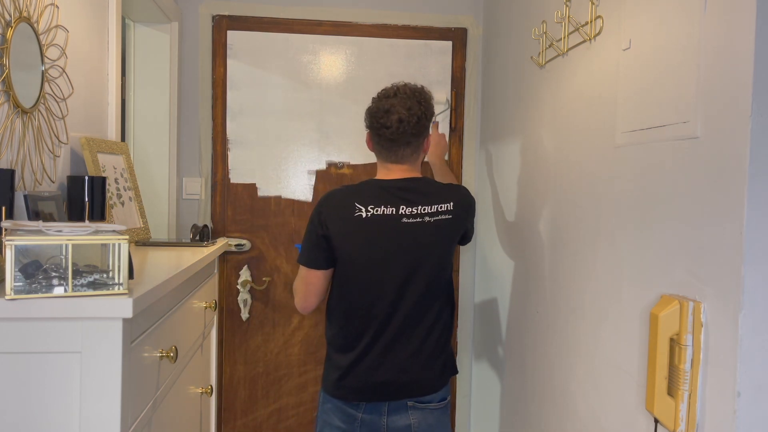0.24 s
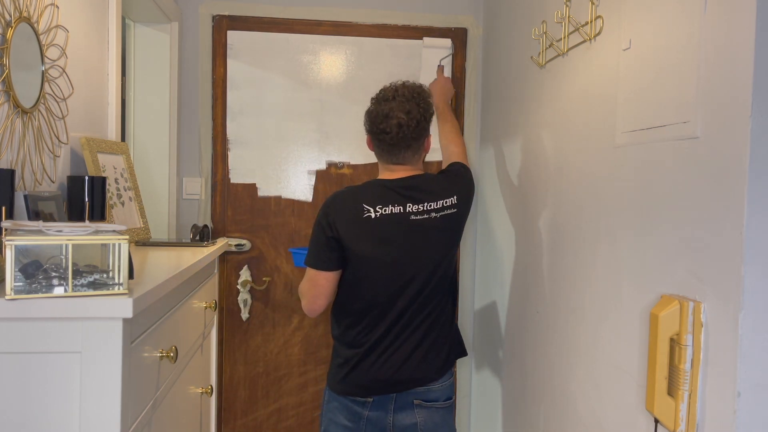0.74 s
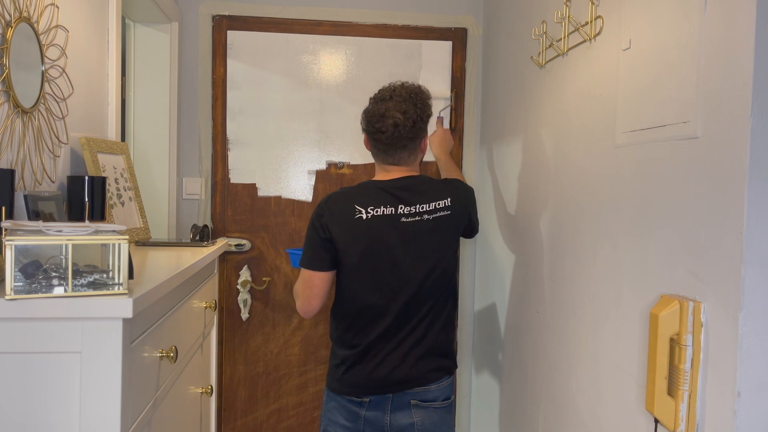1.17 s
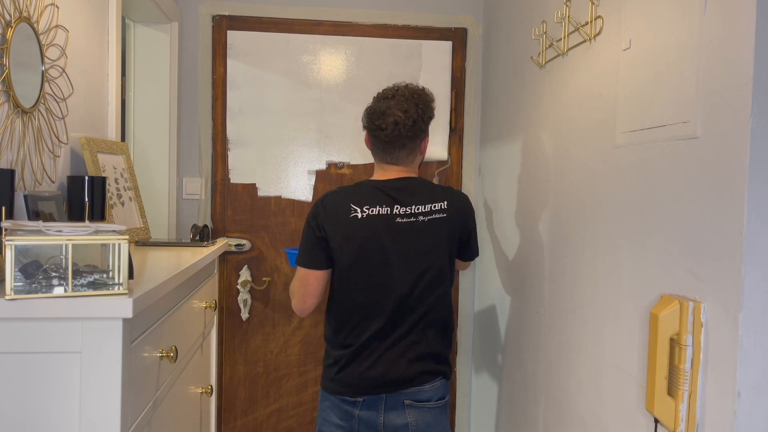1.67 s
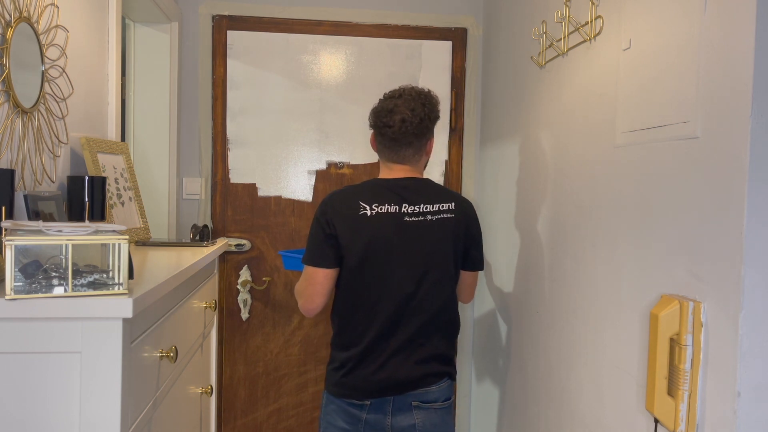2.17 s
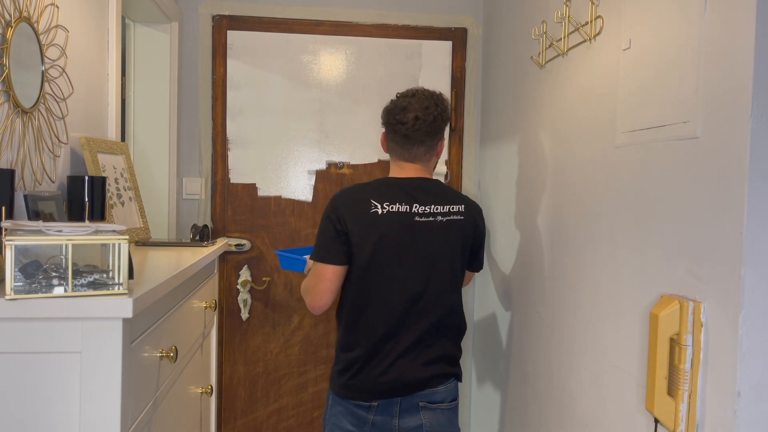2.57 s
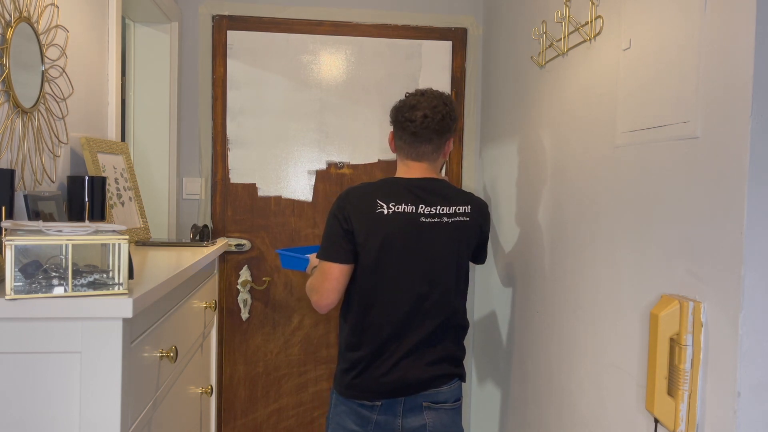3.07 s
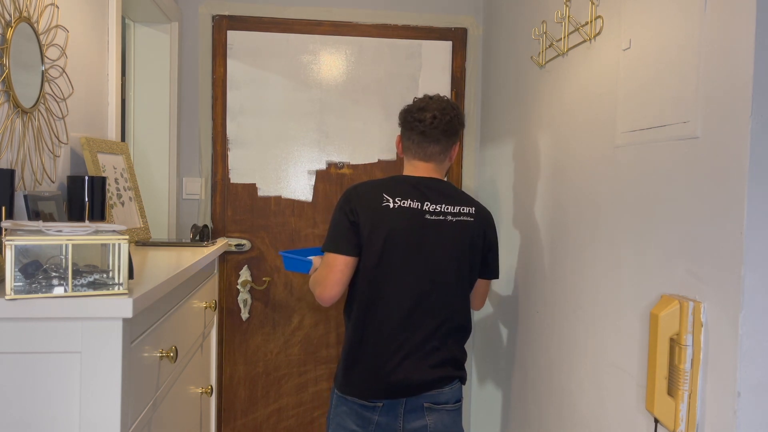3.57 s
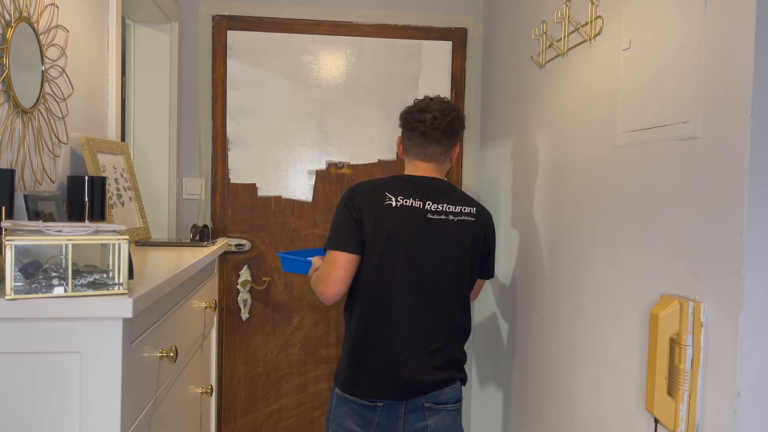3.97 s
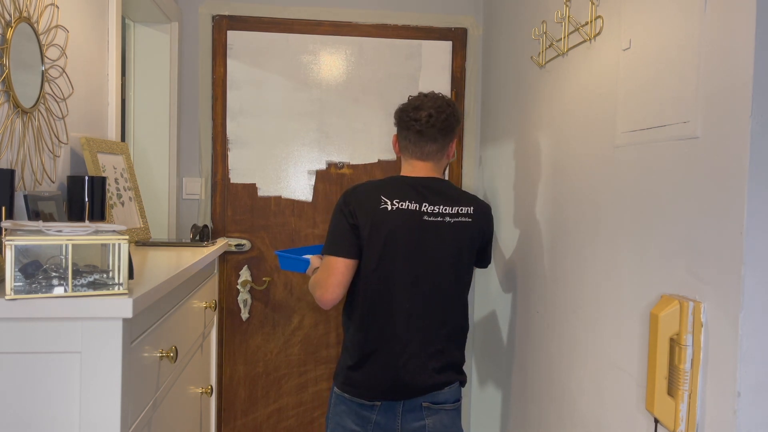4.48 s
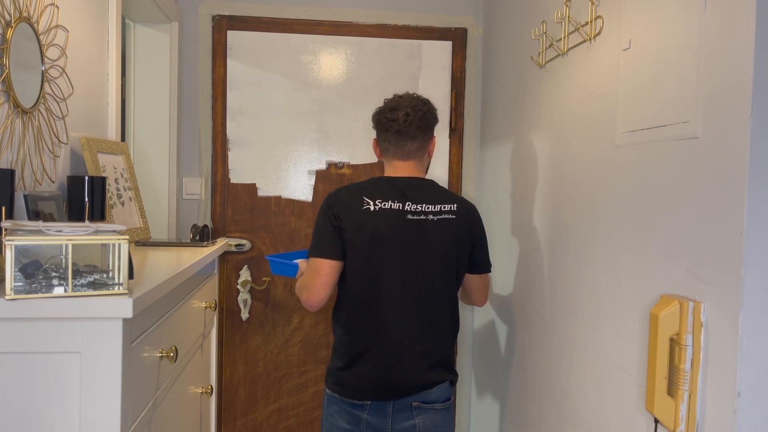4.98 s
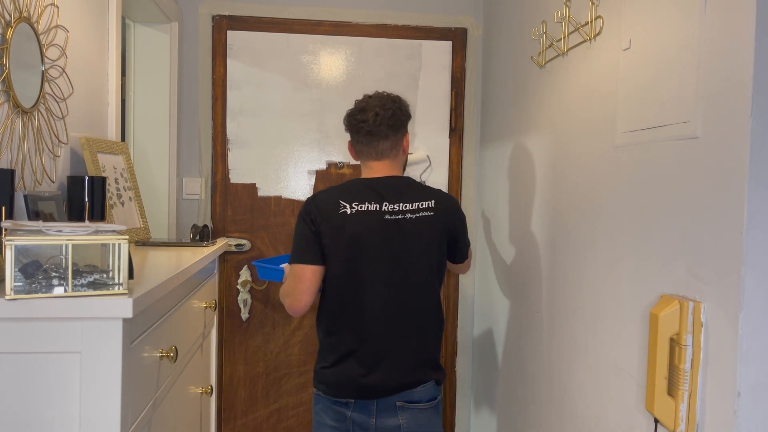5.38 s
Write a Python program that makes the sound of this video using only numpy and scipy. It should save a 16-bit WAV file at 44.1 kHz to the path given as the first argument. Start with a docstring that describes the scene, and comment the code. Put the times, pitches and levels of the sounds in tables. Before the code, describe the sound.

A small wet paint roller hisses stickily over a wooden door in repeated passes, with light clicking knocks and a low panel rumble indoors.

```python
"""A small paint roller is already moving on a wooden door in a narrow hallway; faint air sounds throughout.
In the first second come the end of one pass, a slow faint creep and a short dab, with three bubble ticks.
A long pass with five knocks follows, then five more, two knocks on the second and three on the fourth.
Each pass is a sticky hiss of random snaps, with a nap rub, a hollow note and a low rumble of the door panel.
A knock is a short click of the sleeve on its wire axle, with a scrape, a bounce, a ring and a thud."""
import sys
import numpy as np
from scipy import signal
from scipy.fft import rfft, irfft, next_fast_len
from scipy.io import wavfile
from scipy.ndimage import uniform_filter1d, map_coordinates

SR = 44100
rng = np.random.default_rng(int(sys.argv[2]) if len(sys.argv) > 2 else 0)


def master_out(mix):
    """Clip the mix to full scale and print it as 16-bit PCM to the path in sys.argv[1]."""
    frames = np.transpose(np.atleast_2d(mix))
    ceiling = np.clip(frames, -1, 1)
    pcm = np.round(ceiling * 32767).astype(np.int16)
    wavfile.write(sys.argv[1], SR, pcm)


N = 248178  # length in samples


def amp(db):
    """Turn decibels into gain."""
    return 10 ** (np.asarray(db) / 20)


def unit(x):
    """Scale to an average (rms) level of 1."""
    return x / np.sqrt(np.mean(x ** 2) + 1e-20)


def along(points, hz):
    """Read a curve of (Hz, value) points, with frequency on a log axis."""
    f, v = np.transpose(points)
    return np.interp(np.log(hz + 1), np.log(f + 1), v)


def wobble(rate):
    """Draw a smooth random curve with rate knots a second."""
    knots = rng.standard_normal(int(N * rate / SR) + 4)
    return map_coordinates(knots, [np.arange(N) * rate / SR])


def bumps(rows, width_s):
    """Draw a dB curve with one smooth bump for each (s, dB)."""
    t = np.arange(N) / SR
    return sum(db * np.exp(-((t - s) / width_s) ** 2) for s, db in rows)


def arch(start, end, db, drift, rise_s, fall_s):
    """Shape the gain of one gesture: it grows from rest, drifts in level and comes back to rest."""
    t = np.clip(np.arange(N) / SR, start, end)
    rise = 1 - np.exp((start - t) / rise_s)
    fall = 1 - np.exp((t - end) / fall_s)
    return rise * fall * amp(db + drift * (t - (start + end) / 2))


def together(gains, smear_s=0.053):
    """Add gestures in power and smear them, as the hallway fills the instant of rest at a turn."""
    power = uniform_filter1d(np.sum(np.square(gains), axis=0), size=round(smear_s * SR))
    return np.sqrt(np.abs(power) + 1e-12)


def filtered(x, response):
    """Multiply the spectrum of x by a response that depends on frequency."""
    n = x.shape[-1]
    m = next_fast_len(n + SR // 2)
    return irfft(rfft(x, m) * response(np.fft.rfftfreq(m, 1 / SR)), m)[..., :n]


def coloured(x, spectrum):
    """Give x a (Hz, dB) colour at rms 1."""
    return unit(filtered(x, lambda hz: amp(along(spectrum, hz))))


def resonate(x, modes):
    """Pass x through vibration modes, each a peak of (centre Hz, width Hz, dB)."""
    def response(f):
        return sum(amp(db) * 1j * f * w / (c * c - f * f + 1j * f * w) for c, w, db in modes)
    return filtered(x, response)


def pulse(gain_db, size=4096):
    """Make the shortest causal (minimum-phase) click with a given colour, peak 1."""
    cepstrum = irfft(np.log(amp(gain_db(np.fft.rfftfreq(size, 1 / SR)))))
    # folding the second half onto the first packs the energy at the start
    cepstrum[1:size // 2] *= 2
    cepstrum[size // 2 + 1:] = 0
    click = irfft(np.exp(rfft(cepstrum)))
    return click / np.abs(click).max()


def copies(x, taps):
    """Add up delayed copies of x, one for each (s, dB)."""
    return sum(amp(db) * np.pad(x, (round(s * SR), 0))[:len(x)] for s, db in taps)


# How long the hallway rings.
# Each row: frequency in Hz, time to fade by 60 dB in seconds.
HALL_FADE = [(150, 0.27), (1200, 0.37), (4000, 0.19), (12000, 0.048)]


def hallway(x):
    """Give two unrelated diffuse answers of the hallway, as fading noise; treble dies first."""
    hz, t, z = signal.stft(rng.standard_normal((2, SR // 2)), SR, nperseg=256)
    fade = amp(-60 * t / along(HALL_FADE, hz)[:, None])
    tail = signal.istft(z * fade, SR, nperseg=256)[1]
    return signal.fftconvolve(x[None], tail / np.linalg.norm(tail[0]), axes=1)[:, :len(x)]


# How wide the sound spreads between left and right.
# Each row: frequency in Hz, gain of the side signal against the middle in dB.
STEREO_WIDTH = [(60, -32), (110, -7.5), (200, -12.5), (380, -8), (750, -4), (1500, -6), (2600, -7.5),
                (4000, -8.5), (5700, -4), (8500, -15.5), (11300, -51), (12200, -8)]


def spread(pair):
    """Turn two unrelated signals into left and right, with a width that depends on frequency."""
    side = filtered(pair[1], lambda hz: amp(along(STEREO_WIDTH, hz)))
    return np.array([pair[0] + side, pair[0] - side])


def in_room(x, wet_db):
    """Put a source straight ahead with the hallway around it."""
    return x + amp(wet_db) * spread(hallway(x))


def snaps(rate, scatter_db):
    """Scatter random tiny impulses of very unequal size, rate a second on average, at rms 1."""
    happens = rng.random(N) < rate / SR
    return unit(happens * rng.standard_normal(N) * amp(scatter_db * rng.standard_normal(N)))


def grainy(spectrum, rate, scatter_db, direct_db, blur_s, echo_db):
    """Mix snaps and their echoes; the roller moves, so most echo paths blur into a noisy wash."""
    grains = snaps(rate, scatter_db)
    keep = np.exp(-1 / (blur_s * SR))
    # the loudness of the wash follows the recent energy of the snaps
    energy = signal.lfilter([1 - keep], [1, -keep], grains ** 2 - 1) + 1
    wash = rng.standard_normal((2, N)) * np.sqrt(np.abs(energy))
    pair = wash + amp(echo_db) * unit(hallway(grains))
    pair[0] += amp(direct_db) * grains
    return spread(coloured(np.array([unit(pair[0]), unit(pair[1])]), spectrum))


SPEED_UP_S, SLOW_DOWN_S = 0.15, 0.16  # the arm gathers speed after a turn and brakes before the next
WOOD_LAG_S = 0.018  # after a turn the wood answers a little later than the paint
BEAR_DB, BEAR_LAG_S, BEAR_S = 6, 0.023, 0.024  # just after a knock the sleeve bears harder on the wood
PATCH_S = 0.047  # half the time a patch spends on the door

# The passes of the roller, before their speed-up and slow-down.
# Each row: start in seconds, end in seconds, paint hiss at mid-pass in dB, drift in dB per second,
# nap rub over the hiss in dB, hollow rub over the hiss in dB.
PASSES = [ (-.427, 0.185, -43, -18.5, -11, -21.5), (-.148, 0.857, -57.5, 15.5, -13.5, -17),
          (0.359, 0.543, -36, 5, -19, -18.5), (0.832, 2.28, -47.5, -5.5, -15.5, -21.5),
          (2.302, 3.009, -43, -3, -16.5, -24), (2.999, 3.763, -43, -3.5, -16.5, -24),
          (3.749, 4.415, -41.5, -7.5, -16, -22), (4.443, 4.975, -38.5, -13.5, -16, -24),
          (4.991, 5.684, -40.5, 2.5, -14.5, -20)]
# Wetter (+) or drier (-) patches of the sleeve come round.
# Each row: time in seconds, change of level in dB.
WET_PATCHES = [ (.455, 3.5), (1.07, 3.5), (1.17, -3), (1.39, -7), (1.65, -5), (1.9, -1.5), (2.0, 2.5),
               (2.11, 3.5), (3.39, -2.5), (3.98, 2)]


def rolling():
    """Shape the gains of paint hiss, nap rub and hollow rub from the passes, wet patches and knocks."""
    paint_passes, nap_passes, wood_passes = [], [], []
    for start, end, db, drift, rub_db, hollow_db in PASSES:
        stroke = arch(start, end, db, drift, SPEED_UP_S, SLOW_DOWN_S)
        paint_passes.append(stroke)
        nap_passes.append(amp(rub_db) * stroke)
        late_start, late_end = start + WOOD_LAG_S, end + WOOD_LAG_S
        wood_passes.append(arch(late_start, late_end, db + hollow_db, drift, SPEED_UP_S, SLOW_DOWN_S))
    wetness = amp(bumps(WET_PATCHES, PATCH_S))
    bearing = amp(bumps([(row[0] + BEAR_LAG_S, BEAR_DB) for row in SLEEVE_KNOCKS], BEAR_S))
    return wetness * together(paint_passes), wetness * together(nap_passes), bearing * together(wood_passes)


# The colour of snapping paint threads.
# Each row: frequency in Hz, relative level in dB per Hz.
PAINT_COLOUR = [(1200, -28.5), (2600, -19), (4000, -14), (5200, -11.5), (6600, -10.5), (8000, -4.5),
                (9100, 1), (10200, 2.5), (11000, -4), (12000, -9), (13200, -25), (15700, -21.5)]


def paint(gain, full_treble_db=-49):
    """Threads of wet paint snap behind the sleeve as a dense hiss."""
    threads = grainy(PAINT_COLOUR, rate=4500, scatter_db=2.0, direct_db=-2.5, blur_s=0.093, echo_db=-2)
    hiss = gain * amp(0.7 * wobble(45)) * threads
    # where the gain is below full_treble_db, the hiss is duller in the top treble
    treble_share = [(8500, 0.28), (11500, 0.39), (13000, 1)]  # Hz, share of the hiss
    treble = filtered(hiss, lambda hz: np.clip(along(treble_share, hz), 0, 1))
    treble_gain = np.minimum(gain / amp(full_treble_db), 1) ** 1.16
    return hiss + treble * (treble_gain - 1)


# The colour of the rubbing nap.
# Each row: frequency in Hz, relative level in dB per Hz.
NAP_COLOUR = [(300, -26), (700, -8.5), (1000, 2.5), (1400, 3), (2400, 1.5), (3600, -2), (6000, -31)]
# The colour of the door's hollow note.
# Each row: frequency in Hz, relative level in dB per Hz.
HOLLOW_COLOUR = [(90, -22), (130, 3), (190, 0.5), (280, -1), (400, -0.5), (560, 2), (750, 4), (1200, -16),
                 (3000, -48)]
# The ringing modes of the wire frame, also rung by the knocks.
# Each row: centre in Hz, width in Hz, relative level in dB.
FRAME_MODES = [(410, 13, -17), (819, 13, 11), (898, 14, -9), (1019, 16, 11), (1201, 69, 9), (1300, 42, -16),
               (1430, 12, -6), (1573, 42, 10.5), (1836, 15, -17), (1938, 32, 10.5), (2108, 42, 7.5),
               (2300, 71, -5), (2500, 34, -8)]


def rubbing(nap_gain, hollow_gain):
    """The nap rubs and stirs the wire frame, and the door answers with a hollow note."""
    nap = grainy(NAP_COLOUR, rate=1200, scatter_db=2.5, direct_db=-4.5, blur_s=0.011, echo_db=-1.5)
    frame = spread(unit(resonate(rng.standard_normal((2, N)), FRAME_MODES)))
    rub = nap_gain * amp(1.3 * wobble(45)) * unit(nap + amp(-9) * frame)
    wood = grainy(HOLLOW_COLOUR, rate=600, scatter_db=3.5, direct_db=-6.0, blur_s=0.012, echo_db=0.0)
    return rub + hollow_gain * amp(0.7 * wobble(8.5)) * wood


LEAN_IN_S, LET_GO_S = 0.054, 0.21  # pressure builds quickly and eases slowly
PANEL_HZ = 65  # the strongest low mode of the panel

# The hand leans on the door.
# Each row: start in seconds, end in seconds, panel rumble at the middle in dB, drift in dB per second,
# higher modes over the rumble in dB; levels are before the build-up and easing.
HAND_PRESSES = [ (-.161, .245, -56, 11, -19), (0.852, 2.386, -67.5, 12, -17.5),
                (2.437, 2.95, -49.5, -20, -28), (3.217, 3.737, -54, 29, -20),
                (3.759, 4.42, -47.5, -10, -22), (4.575, 5.043, -43.5, -22, -22),
                (5.074, 5.693, -44, 9, -17.5)]
# The lowest modes of the door panel.
# Each row: centre in Hz, width in Hz, relative level in dB.
LOW_DOOR_MODES = [(33, 3.4, -4.5), (40.7, 7, -2.1), (PANEL_HZ, 5, 5.1), (71.5, 15, -18), (102, 14, -24)]
# The panel's higher modes, also struck by the knocks.
# Each row: centre in Hz, width in Hz, relative level in dB.
HIGH_DOOR_MODES = [(109, 7.7, 4.5), (138.5, 5.8, -0.5), (172.7, 8.2, 6.5), (213.5, 21, -2),
                   (292, 61, -11.5)]


def rumble(lumpy_db=1.5):
    """The uneven sleeve shakes the door panel, mostly in its lowest modes."""
    presses = []
    for start, end, db, drift, upper_db in HAND_PRESSES:
        press = arch(start, end, db, drift, LEAN_IN_S, LET_GO_S)
        presses.append(press * amp([[0], [upper_db]]))
    swing, upper_swing = together(presses) * amp(lumpy_db * wobble(16))
    low = resonate(rng.standard_normal((2, N)), LOW_DOOR_MODES)
    # the hand keeps the pressure even, so the panel's swing follows the press
    low /= np.sqrt(np.abs(uniform_filter1d(low ** 2, size=5000, axis=1)) + 1e-20)
    # keep about 27 to 95 Hz
    low = filtered(swing * low, lambda hz: 1 / np.sqrt((1 + (27 / (hz + 1)) ** 12) * (1 + (hz / 95) ** 10)))
    upper = resonate(rng.standard_normal((2, N)), HIGH_DOOR_MODES)
    upper = unit(filtered(upper, lambda hz: 1 / (1 + (hz / 400) ** 4)))
    return spread(low + upper_swing * upper)


# The sleeve hits its stop.
# Each row: time in seconds, level of the direct hit in dB, nominal pitch in Hz (its square root
# shifts the colour), bounce over the hit in dB, door thud over the hit in dB.
SLEEVE_KNOCKS = [ (1.066, -37.5, 1120, -6, -11), (1.272, -41.5, 1140, -6, -18), (1.527, -44, 1160, -6, -19),
                 (1.798, -39.5, 1380, -7, -18), (2.045, -36, 1400, -9, -20.5),
                 (3.274, -29.5, 1950, -6, -19), (3.475, -31.5, 1560, -15, -16.5),
                 (4.563, -27.5, 1650, -3.5, -24), (4.686, -24.5, 1900, -8, -19.5),
                 (4.843, -35, 1460, -5, -27)]
# The colour of a hit whose nominal pitch is 1500 Hz.
# Each row: frequency in Hz, relative level in dB.
SLEEVE_COLOUR = [(100, -48.5), (350, -15), (600, -10), (900, -4.5), (1450, -0.5), (2100, -4.5), (2800, -11),
                 (3500, -13), (4500, -42), (6500, -101)]
# Early echoes from the walls.
# Each row: delay in seconds, level in dB.
WALL_ECHOES = [(.0028, -9), (.0075, -19), (0.0138, -6), (0.0204, -21), (.029, -14.5)]


def knocks(lead_s=.003, scrape_db=-16, bounce_s=.0053, ring_db=-15, wet_db=-2):
    """The sleeve scrapes up to its stop, hits it and bounces; the wire frame rings and the door thuds."""
    out = np.zeros((2, N + SR))
    lead = round(lead_s * SR)
    for s, db, centre_hz, bounce_db, thud_db in SLEEVE_KNOCKS:
        # a higher pitch makes a shorter click
        click = pulse(lambda hz: along(SLEEVE_COLOUR, hz * np.sqrt(1500 / centre_hz)))
        blow = copies(np.pad(click, (0, SR // 3)), [(lead_s, 0), (lead_s + bounce_s, bounce_db)])
        scrape = signal.fftconvolve(rng.standard_normal(lead) * np.linspace(.3, 1, lead), click)
        blow[:len(scrape)] += amp(scrape_db) * scrape / np.std(scrape[:lead])
        ring = amp(ring_db) * np.std(blow) * unit(resonate(blow, FRAME_MODES))
        thud = resonate(signal.unit_impulse(len(blow), lead), HIGH_DOOR_MODES)
        near = blow + copies(blow, WALL_ECHOES) + amp(thud_db) * thud / np.abs(thud).max()
        heard = near + ring + amp(wet_db) * spread(hallway(blow + ring))
        first = round(s * SR) - lead // 2
        out[:, first:first + len(blow)] += amp(db) * heard
    return out[:, :N]


# Single paint bubbles burst.
# Each row: time in seconds, level in dB before the 3.5 dB cut and the added hallway.
BUBBLES = [(0.181, -43), (0.5921, -58), (0.6975, -44)]


def ticks():
    """Each bursting bubble is a small bright click, strongest near 8500 Hz."""
    bursts = np.zeros(N)
    for s, db in BUBBLES:
        bursts[round(s * SR)] = amp(db - 3.5)
    colour = [(300, -14), (2000, -10), (8500, 38), (11000, -8), (15000, -26)]  # Hz, dB
    click = pulse(lambda hz: along(colour, hz))
    return in_room(signal.fftconvolve(bursts, click)[:N], wet_db=3)


# The colour of the building's steady rush.
# Each row: frequency in Hz, relative level in dB per Hz.
AIR_COLOUR = [(25, 8), (65, 13.5), (105, 14), (240, -3), (450, -5.5), (700, -14), (1200, -24), (3200, -28),
              (9000, -36), (13000, -55)]


def still_air():
    """The building gives a faint steady rush of noise, with a thin whine at 696 Hz in it."""
    rush = amp(-72.5) * coloured(rng.standard_normal((2, N)), AIR_COLOUR)
    whine = amp(-92.5) * unit(resonate(rng.standard_normal((2, N)), [(696, 9.4, 0)]))
    return spread(rush + whine)


# The balance between the two sides.
# Each row: frequency in Hz, left over right in dB.
LEFT_LEAN = [(60, -1), (250, 1), (600, -2), (1300, 0.5), (2800, 1), (5500, 3.5), (9000, 0)]


def scene():
    """Add all sources and lean them slightly left or right by frequency."""
    hiss, nap, hollow = rolling()
    sound = paint(hiss) + rubbing(nap, hollow) + rumble() + knocks() + ticks() + still_air()
    return filtered(sound, lambda hz: amp(np.array([[.5], [-.5]]) * along(LEFT_LEAN, hz)))


TOP_HZ = 15800  # nothing is kept from here up

# The two microphone ports fall out of step in the top octave.
# Each row: frequency in Hz, lead of the right port over the left in cycles.
PORT_LEAD = [(8400, 0), (10100, .5), (11800, 1), (12600, 1), (13150, 1.5), (14350, 1.5), (14750, 2)]


def record(dry):
    """The two ports turn the treble's phase against each other, and the highest treble is cut off."""
    sides = np.array([[-1], [1]])
    return filtered(dry, lambda hz: np.exp(1j * np.pi * sides * along(PORT_LEAD, hz)) * (hz < TOP_HZ))


dry = scene()
out = record(dry)
master_out(out)
```